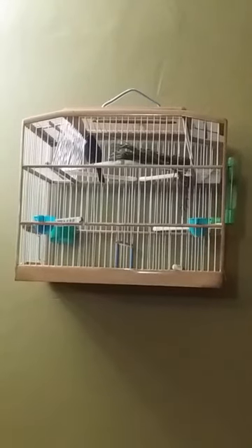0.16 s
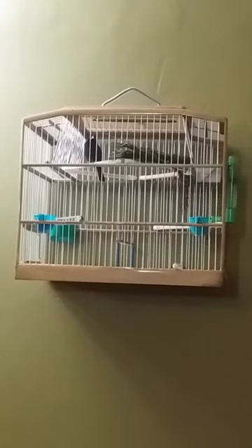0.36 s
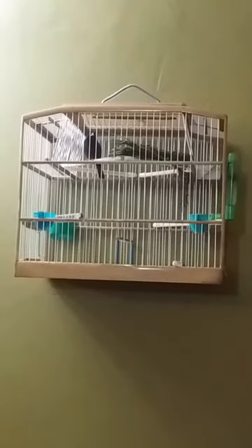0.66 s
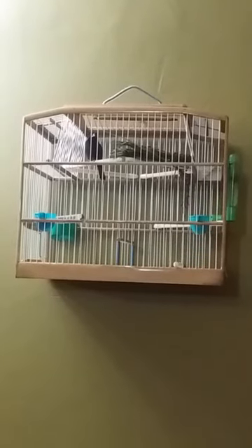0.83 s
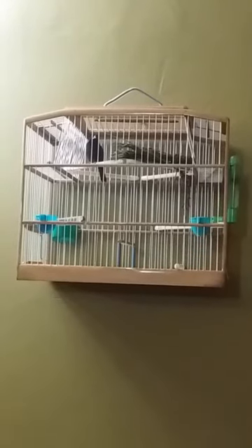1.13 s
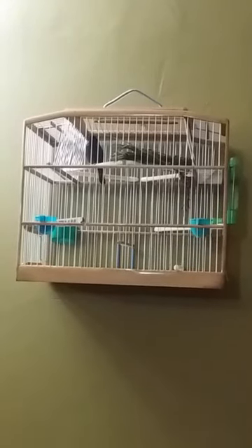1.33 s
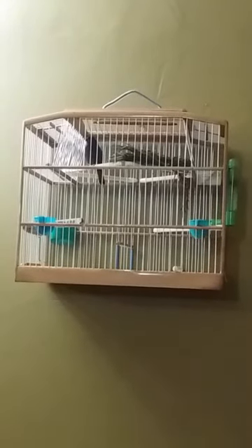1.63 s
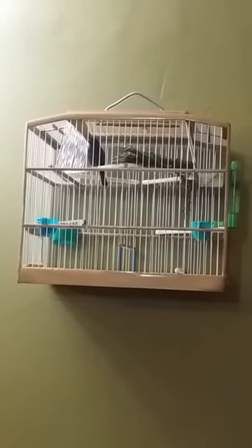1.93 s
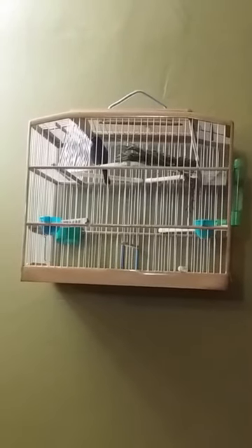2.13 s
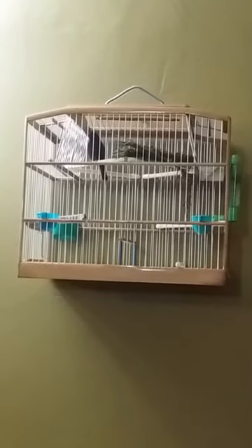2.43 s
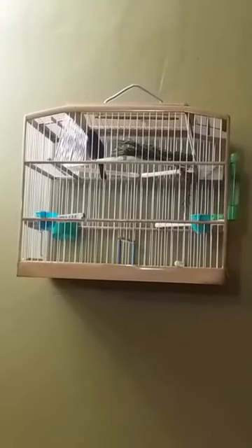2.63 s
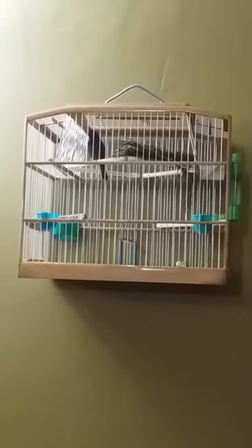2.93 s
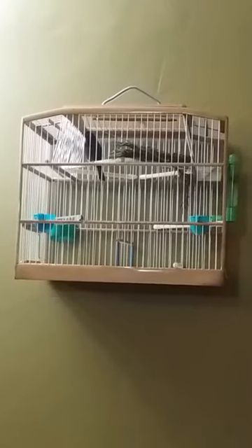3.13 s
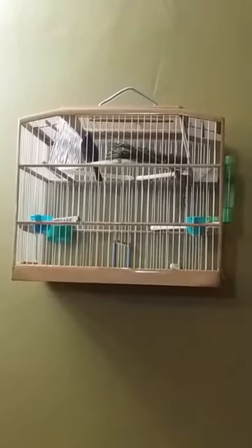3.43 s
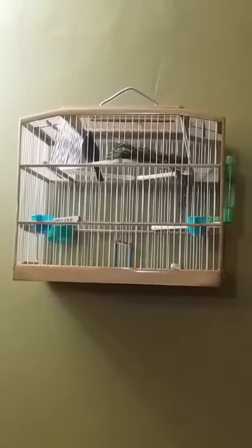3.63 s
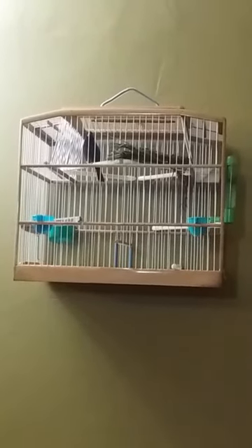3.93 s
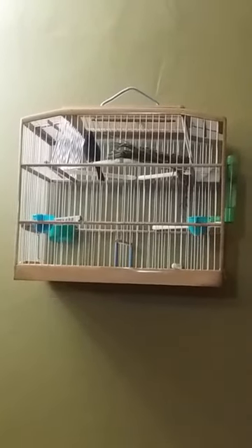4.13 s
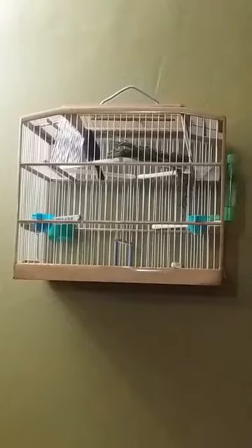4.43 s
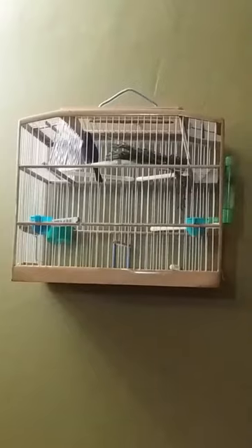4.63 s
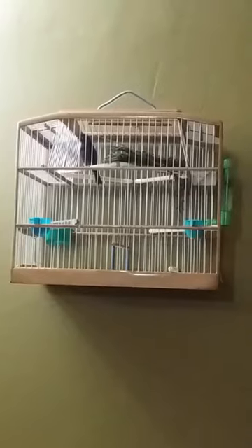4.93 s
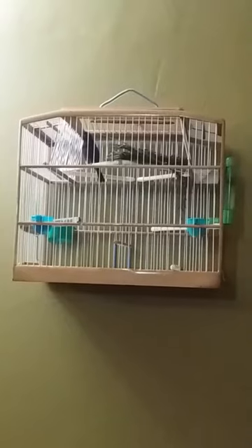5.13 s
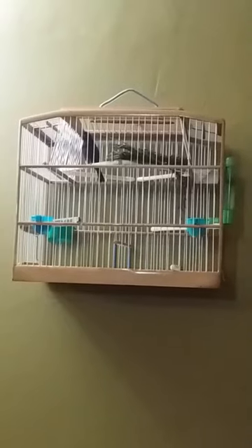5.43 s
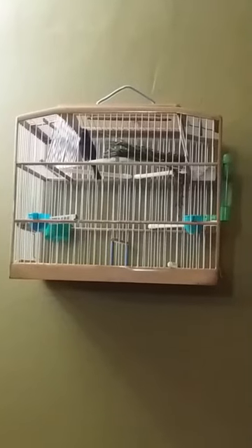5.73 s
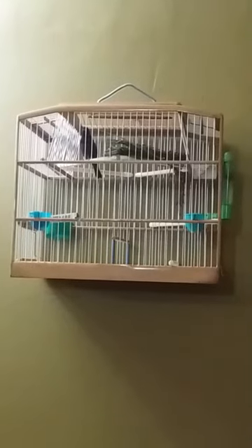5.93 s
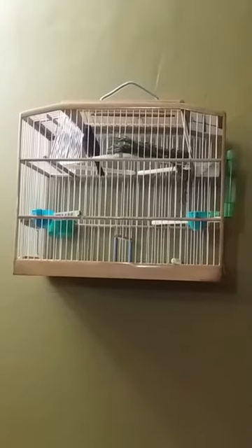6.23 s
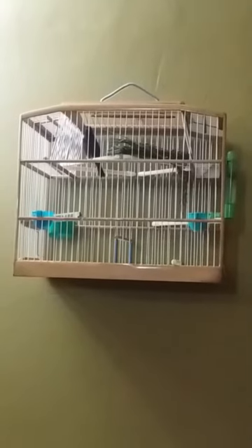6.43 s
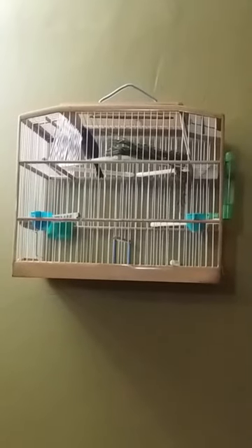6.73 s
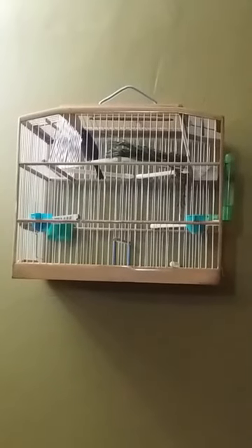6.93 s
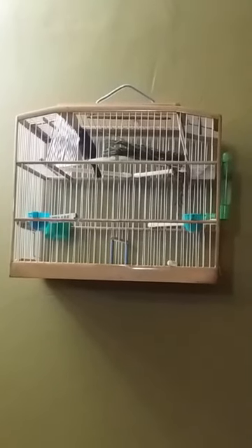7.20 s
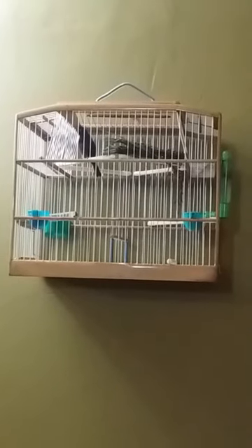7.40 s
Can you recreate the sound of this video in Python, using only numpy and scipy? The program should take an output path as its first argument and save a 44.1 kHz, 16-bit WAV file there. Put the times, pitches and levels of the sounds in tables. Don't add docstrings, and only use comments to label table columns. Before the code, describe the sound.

A caged finch moves from faint tries to loud, clear gliding whistles in an echoing room while night frogs whistle rising calls outside.

```python
import sys
import numpy as np
from scipy import signal
from scipy.fft import rfft, irfft, next_fast_len
from scipy.io import wavfile
from scipy.ndimage import uniform_filter1d, minimum_filter1d

SR = 44100
rng = np.random.default_rng(int(sys.argv[2]) if len(sys.argv) > 2 else 0)


def ratio(d):
    e = np.asarray(d, float) / 20
    return 10 ** e


def wav_out(sig):
    wavfile.write(sys.argv[1], SR, np.round(np.clip(np.atleast_2d(sig).T, -1, 1) * 32767).astype(np.int16))


N = 333374
TIME = np.arange(N) / SR


def walk(rate_hz):
    k = int(SR / rate_hz)
    held = np.repeat(rng.standard_normal(N // k + 1), k)
    return 1.3 * uniform_filter1d(uniform_filter1d(held, k), k)[:N]


def noise(points, db):
    size = next_fast_len(N)
    hz, gain_db = np.transpose(points)
    bins_hz = np.arange(1, size // 2 + 2) * SR / size
    shape_db = np.interp(np.log(bins_hz), np.log(hz), gain_db, -200, -200)
    x = irfft(rfft(rng.standard_normal(size)) * ratio(shape_db), size)[:N]
    return x * ratio(db) / np.std(x)


def add(out, x, s):
    i = int(round(s * SR))
    x = x[max(-i, 0):N - i]
    out[max(i, 0):max(i, 0) + len(x)] += x


def whistle(hz, db, edge_s, overtones_db=()):
    t = np.arange(len(hz)) / SR
    phase = 2 * np.pi * np.cumsum(hz) / SR
    tone = ratio(db) * np.sin(phase)
    upper_db = .45 * db + 11 * np.log2(hz / 4000)
    for number, partial_db in enumerate(overtones_db, 2):
        audible = number * hz < .45 * SR
        tone += ratio(partial_db + upper_db) * np.sin(number * phase) * audible
    return np.sqrt(2) * tone * np.clip(np.minimum(t, t[-1] - t) / edge_s, 0, 1)


def space(t60_s, wet_db, build_s, walls):
    t = np.arange(SR) / SR
    tail = rng.standard_normal(SR) * (1 - np.exp(-t / build_s)) * np.exp(-np.log(1000) * t / t60_s)
    tail *= ratio(wet_db) / np.sqrt(np.sum(tail ** 2))
    tail[0] = 1
    for delay_s, db in walls:
        tail[int(delay_s * SR)] = ratio(db)
    return tail


# (steepest moment t/s, settling time t/s, first f/Hz, last f/Hz, peak level/dB)
STEPS = [
    (2.662, .015, 5030, 4467, -30),
    (5.074, 0.019, 5100, 4230, -17),
]
PLUNGES = [
    (2.906, .013, 5146, 3786, -27),
    (5.313, .02, 5205, 3582, -12.5),
    (5.56, .024, 5187, 3560, -13),
]
DIVES = [
    (6.986, .019, 5173, 3950, -13.5),
    (7.53, .03, 4923, 3482, -11),
]
SLIDES = [
    (3.858, .025, 4940, 3553, -22),
    (7.243, .045, 4897, 3030, -16),
]
RISES = [
    (4.176, 0.023, 3240, 4097, -20),
    (4.416, .016, 3263, 3880, -15.5),
    (4.892, .016, 3136, 3666, -15.5),
    (5.847, 0.023, 3148, 4082, -9),
    (6.062, .018, 3128, 3943, -6.5),
    (6.59, .015, 3240, 3770, -11),
    (6.814, .014, 3133, 3593, -13),
]
LILTS = [
    (3.17, .032, 3426, 4092, -24.5),
    (3.624, .032, 3493, 4060, -25),
]
SAGS = [
    (4.628, 0.031, 3360, 2777, -21),
    (6.291, .018, 3320, 2814, -18.5),
]
ARCHES = [
    (3.357, .012, 3480, 3680, -27.5),
]
# (onset, steepest moment, end level/dB re peak)
MANNERS = [
    ((.048, .065, 2.2, .026, .1), (-21, -13, -3)),
    ((.041, .09, 1.2, .045, 1.9), (-20, -5.5, -12)),
    ((.029, .08, 1.8, .02, .1), (-14, -4, -1.5)),
    ((.056, .08, 1.9, .04, .3), (-15, -2, -11)),
    ((.044, .045, .9, .025, .2), (-21, -6, -9)),
    ((.02, .055, .7, .045, .1), (-7, -6, -9)),
    ((.056, .08, 1.6, .012, .6), (-14, -1.1, -10)),
]
ARCH_MANNER = ((.012, .175, 1.5, .035, -7.2), (-14, -9, -7))
# (f/Hz, level/dB)
THROAT = [(2700, -4), (3300, 1.16), (4300, -1.7), (4800, -5), (5300, -13)]
OVERTONES_DB = (-64, -66, -77, -64)


def glides(out):
    tremble, flutter_db = 1 + .0033 * walk(150), 4 * walk(90)
    kinds = STEPS, PLUNGES, DIVES, SLIDES, RISES, LILTS, SAGS, ARCHES
    for notes, (timing, swell_db) in zip(kinds, MANNERS + [ARCH_MANNER]):
        lead, hold, more, swell, drift = timing
        onset_db, turn_db, end_db = swell_db
        for s, settle, first_hz, last_hz, db in notes:
            t = np.arange(-lead, hold + more * settle, 1 / SR)
            moved = np.exp(-np.exp(-t / settle)) + drift * np.maximum(t, 0)
            hz = (first_hz + (last_hz - first_hz) * moved) * np.interp(s + t, TIME, tremble)
            level_db = db + np.interp(t, [-lead, 0, swell, t[-1]], [onset_db, turn_db, 0, end_db])
            level_db += np.interp(hz, *np.transpose(THROAT)) + np.interp(s + t, TIME, flutter_db)
            add(out, whistle(hz, level_db, .005, OVERTONES_DB), s - lead)


# (t/s,
# length t/s, first f/Hz, last f/Hz, level/dB)
TRIES = [(.13, .09, 3400, 3540, -62), (.2, .17, 3520, 3480, -66), (.47, .1, 4400, 4330, -69),
         (.94, .08, 4340, 4350, -70), (.98, .06, 3455, 3650, -60), (1.43, .08, 4350, 4300, -74),
         (1.85, .07, 3530, 3700, -69), (1.85, .1, 4400, 4400, -75), (2.31, .08, 4350, 4350, -73),
         (1.045, .04, 7460, 7700, -66), (2.11, .05, 7450, 7600, -71), (3.27, .04, 7470, 7600, -69),
         (4.33, .06, 2140, 2500, -51), (2.415, .045, 3700, 3810, -62), (2.457, .03, 3890, 3970, -49),
         (.59, .09, 1360, 1290, -61), (6.885, .065, 3570, 3480, -21), (4.48, .05, 1050, 1150, -56),
         (6.29, .12, 5880, 5560, -58), (4.61, .12, 5900, 5560, -63)]
# (t/s, length t/s, first f/Hz, last f/Hz, level/dB)
HALVES = [
    (4.17, .06, 5350, 6050, -65),
    (4.18, .06, 9200, 10100, -72),
    (4.2, .05, 13900, 14100, -75),
    (4.18, .15, 1950, 2050, -53),
]


def tries(out):
    for s, length, first_hz, last_hz, db in TRIES + HALVES:
        add(out, whistle(np.linspace(first_hz, last_hz, int(length * SR)), db, .0064), s)


# (t/s, f/Hz, level/dB)
TICKS = [(.271, 4200, -57), (.73, 4800, -54), (.955, 3900, -51), (1.147, 4800, -47.5), (1.181, 4330, -46),
         (1.257, 4330, -49.5), (1.28, 1380, -33.5), (2.473, 4830, -48), (2.567, 5000, -53.5),
         (3.293, 5000, -51), (3.605, 4450, -49.5), (5.093, 5600, -44), (5.15, 5420, -44.5),
         (6.535, 4480, -41), (6.755, 4700, -41), (6.866, 4700, -42), (7.047, 5600, -42.5)]


def claws(out):
    t = np.arange(SR // 50) / SR
    for s, hz, db in TICKS:
        add(out, ratio(db) * np.sin(2 * np.pi * hz * t) * np.exp(-t / .001), s)


# (delay t/s, level/dB)
CAGE_WALLS = [(.0031, -8), (.0074, -9), (0.0125, -10), (.019, -2)]


def finch():
    out = np.zeros(N)
    glides(out)
    tries(out)
    claws(out)
    room = space(.76, -1, .0081, CAGE_WALLS)
    return signal.fftconvolve(out, room)[:N]


# (f/Hz, level/dB per Hz)
SPLASH = [(3900, -12), (4300, 0), (4900, -2), (5300, -10), (5900, -14), (6100, -30)]


def song_hiss(song):
    strength = np.sqrt(uniform_filter1d(song ** 2, size=9000) + 1e-12)
    patches_db = 4 * walk(16)
    return strength * ratio(patches_db) * noise(SPLASH, -47)


# (lead t/s, length t/s, first f/Hz, top f/Hz, delays of two walls t/s)
SWEEPS = [
    (-.012, .132, 1020, 2810, .042, .09),
    (-.008, .138, 1000, 3010, .036, .09),
    (-.025, .13, 1000, 2650, .035, .08),
    (.003, .11, 1100, 2870, .045, .1),
    (-.005, .13, 1100, 3170, .035, .08),
    (-.005, .135, 1000, 2640, .04, .08),
]
# (f/Hz, level/dB)
SAC = [(1000, -14), (1250, -17.5), (1550, -17), (2000, -3), (2450, -0.1), (2800, -1.04), (3200, -2.5)]
# (call level/dB, first wall level/dB, second wall level/dB)
FROG_DB = [(-37, -4, -17), (-44, 2, -8), (-46, -3, -12), (-47.5, -3, -8), (-51.5, 3, -11.5),
           (-43, -8.5, -14)]
# (t/s, level/dB)
NEAR_CALLS = [
    [(-.105, -0.5), (.644, -0.5), (2.113, -1), (2.852, -1.5), (3.838, 1), (4.512, 1.3), (5.507, -1),
     (6.156, 0), (7.045, 0.5)],
    [(.228, 1.7), (1.062, 1.8), (1.692, 2.7), (2.591, 2.5), (3.355, 1), (4.055, 1), (5.009, 2.5)],
    [(.456, -2.5), (1.275, -2), (1.939, -1.5), (3.571, -1), (4.3, -3), (5.297, -2), (6.565, -3)],
]
FAR_CALLS = [
    [(.065, -11), (.19, -4), (1.005, 0), (2.365, -1), (2.536, -0.5), (3.14, 2), (5.253, 0.5), (5.909, 1.5),
     (6.821, 1.5)],
    [(.875, -2), (3.235, 3.5)],
    [(1.5, -7.5), (4.03, -11)],
]


def frogs():
    out = np.zeros(N)
    for sweep, levels, calls in zip(SWEEPS, FROG_DB, NEAR_CALLS + FAR_CALLS):
        lead, length, first_hz, top_hz, *delays = sweep
        db, *walls_db = levels
        turn = np.minimum(np.arange(0, length + .014, 1 / SR) / length, 1) ** 1.15
        hz = first_hz + (top_hz - first_hz) * np.sin(np.pi / 2 * turn)
        call = whistle(hz, db + np.interp(hz, *np.transpose(SAC)), .012)
        call = signal.fftconvolve(call, space(.06, -5, .002, []))[:SR // 4]
        yard = space(.9, 3, .008, zip(delays, walls_db))
        heard = signal.fftconvolve(call, yard)
        for s, call_db in calls:
            add(out, heard * ratio(call_db), s + lead)
    return out


# (number, rms level/dB)
WHINE = [(38, -83), (39, -73), (40, -72), (41, -64), (42, -66), (43, -64.5), (44, -70), (45, -72),
         (46, -66.5), (47, -75), (48, -89), (49, -93), (50, -97), (51, -96)]


def whine():
    phase = 2 * np.pi * np.cumsum(160.27 * (1 + .0005 * walk(1.5))) / SR
    out = np.zeros(N)
    for k, db in WHINE:
        spread = .16 * (k - 43) ** 2
        level = np.sqrt(2) * ratio(db + 1.5 * walk(6))
        out += level * np.sin(k * phase + spread + .25 * walk(6))
    rasp = noise([(5800, -22), (6200, -13), (6700, -1), (7000, 0), (7400, -3), (7700, -13), (8300, -24)], -64)
    return ratio(3) * out + rasp * (1 + .29 * np.sin(phase))


# (f/Hz, rms level/dB)
HUM = [(59.2, -66.5), (118.4, -62), (193.8, -60.5), (360.7, -67), (387.6, -73.5), (506.0, -67.5)]
# (f/Hz, level/dB per Hz)
HOUSE = [(25, -41.5), (42, -10.5), (81, -12.5), (108, -0.5), (166, -4), (198, -3), (243, -0.5),
         (319, -12.5), (353, -10), (433, -11.5), (499, -11.5), (629, -16), (900, -16.5), (1170, -44.5),
         (1980, -120)]


def house():
    out = noise(HOUSE, -51)
    for hz, db in HUM:
        level = np.sqrt(2) * ratio(db + 2 * walk(5.2))
        out += level * np.sin(2 * np.pi * hz * TIME + .5 * walk(1.4))
    return out


# (f/Hz, level/dB per Hz)
NIGHT = [(530, -49.5), (900, -25), (1020, -12.5), (1400, -14.5), (2560, -8), (2700, -6), (3230, -22),
         (4260, -26), (4910, -32), (6380, -67.5), (10800, -120)]


def far_chorus():
    return ratio(.75 * walk(2.8)) * noise(NIGHT, -52)


# (f/Hz, level/dB per Hz)
HISS = [(4800, 6), (5300, 8), (5900, 5), (8100, 4), (8500, -1), (12000, 0), (15000, 1.5), (15800, 2)]


def phone_hiss():
    return noise(HISS, -76.3)


def scene():
    song = finch()
    background = house() + far_chorus() + phone_hiss()
    return (song + song_hiss(song) + frogs() + whine() + background)[None]


def top_cut(x):
    return signal.sosfilt(signal.butter(12, 15720, fs=SR, output="sos"), x)


def record(dry):
    dry = signal.sosfilt(signal.butter(4, 47, "high", fs=SR, output="sos"), dry)
    gain = np.minimum(1, .85 / (np.abs(dry) + 1e-9))
    gain = minimum_filter1d(gain, size=801)
    gain = uniform_filter1d(uniform_filter1d(gain, size=400), size=400)
    mix = dry * gain - .0007
    return top_cut(mix)


dry = scene()
out = record(dry)
wav_out(out)
```